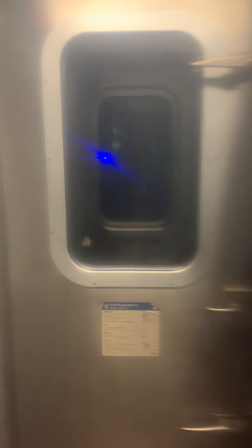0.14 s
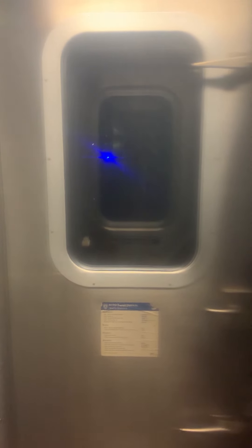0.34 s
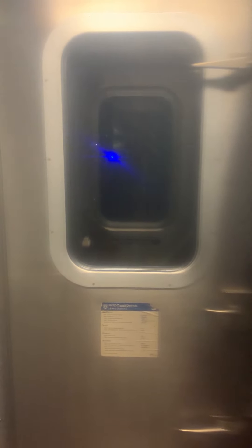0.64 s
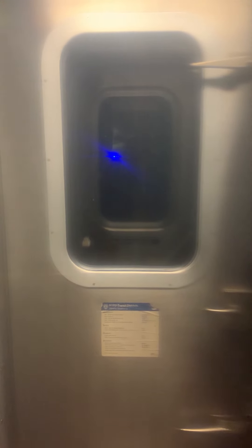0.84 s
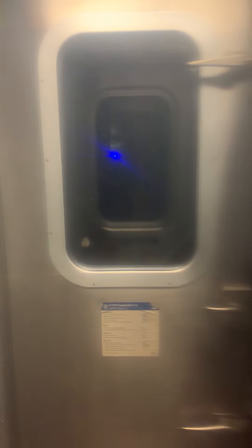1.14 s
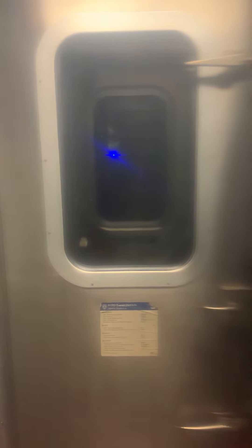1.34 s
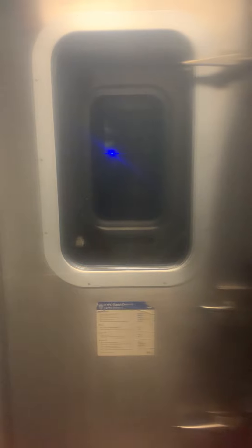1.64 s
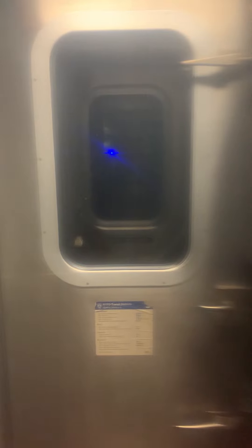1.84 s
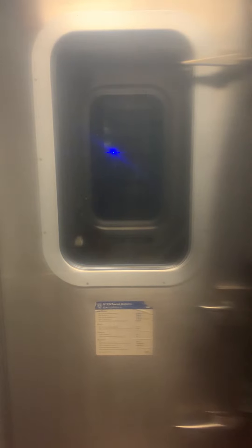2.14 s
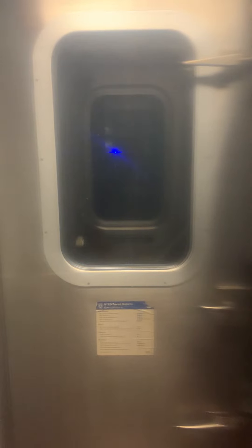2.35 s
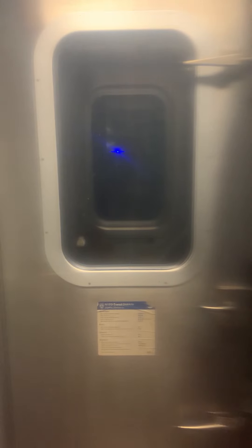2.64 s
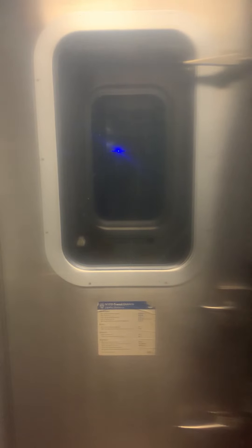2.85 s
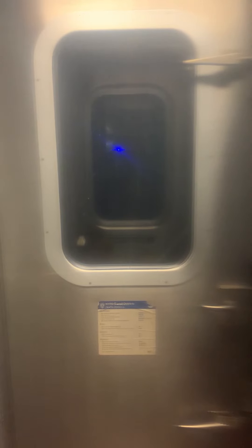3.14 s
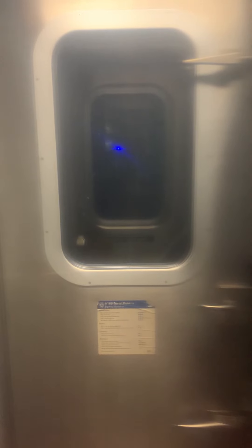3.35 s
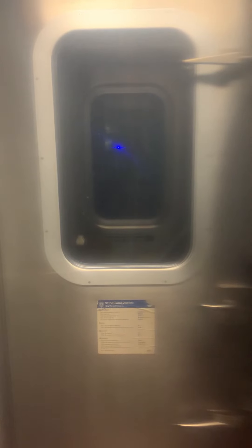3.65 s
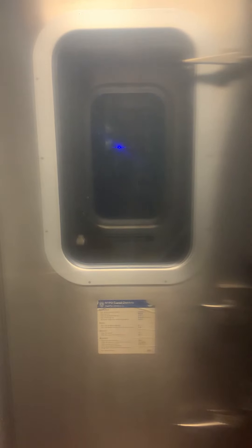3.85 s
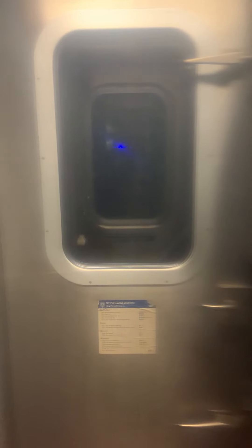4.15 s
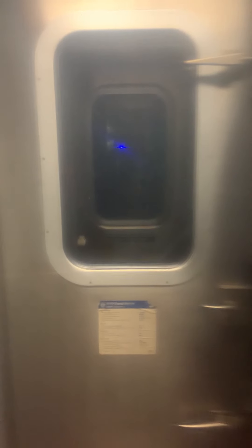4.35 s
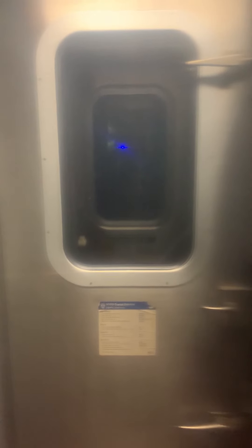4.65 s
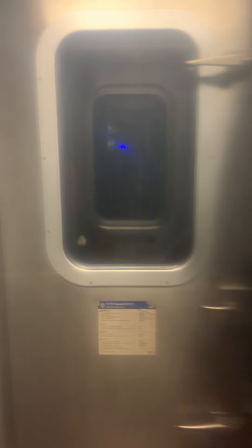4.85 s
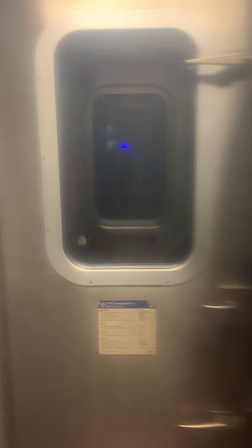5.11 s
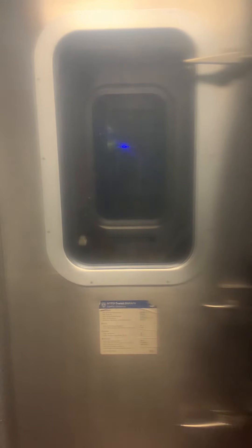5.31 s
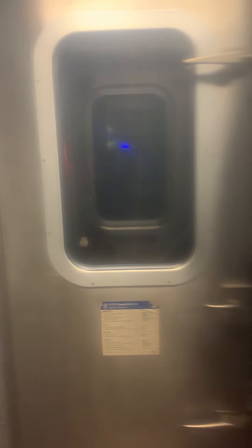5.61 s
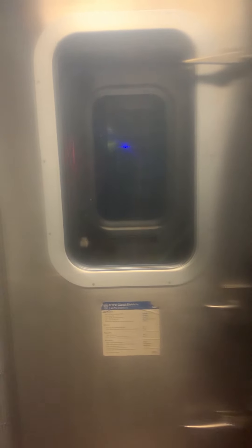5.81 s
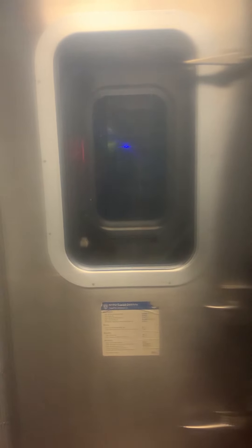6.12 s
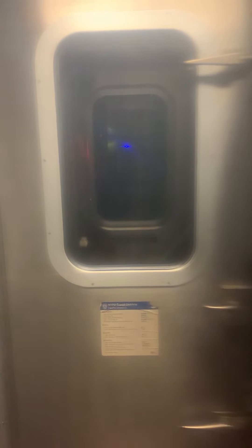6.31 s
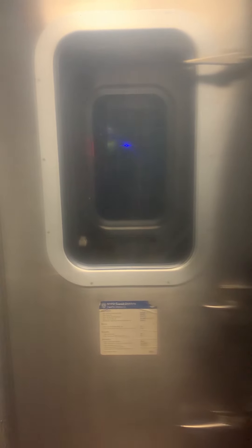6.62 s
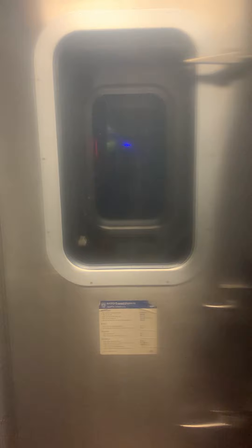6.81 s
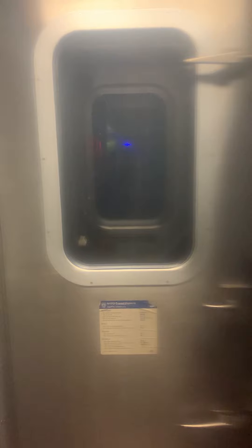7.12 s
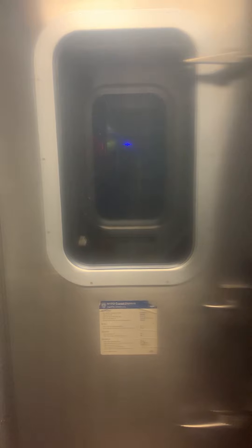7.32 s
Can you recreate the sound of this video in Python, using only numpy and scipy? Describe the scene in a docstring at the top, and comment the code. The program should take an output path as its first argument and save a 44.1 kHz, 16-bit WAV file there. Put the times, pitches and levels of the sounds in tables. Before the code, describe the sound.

Inside a speeding subway car, deep wheel rumble and droning roar continue while a loose end door ticks, thumps and clacks midway.

```python
"""Underground train ride beside a loose door.

Inside the last car at speed, next to the end door: wheel-on-rail noise shakes the floor and roars through
the car's resonances (shaped noise), some of which hum alone; noise bands swell and the wheels sing faintly.
The loose door thumps and clacks, a panel clatters, small metal parts tick and jingle (struck decaying modes).
Two close microphone ports hear the treble almost alike, with the right one later there.
"""
import sys
import numpy as np
from scipy import signal
from scipy.fft import rfft, irfft, next_fast_len
from scipy.io import wavfile

SR = 44100
rng = np.random.default_rng(int(sys.argv[2]) if len(sys.argv) > 2 else 0)


def output_pcm(signal):
    """Save a mono or channel-first signal as 16-bit PCM at the path in sys.argv[1].

    Samples are clipped to [-1, 1] before scaling.
    """
    pcm = np.clip(np.atleast_2d(signal).T, -1, 1) * 32767
    wavfile.write(sys.argv[1], SR, np.round(pcm).astype(np.int16))


N = 329418
SIZE = next_fast_len(N + 4096)
HZ = np.maximum(np.fft.rfftfreq(SIZE, 1 / SR), 1)


def from_db(db):
    """Decibels to gain."""
    return 10 ** (np.asarray(db) / 20)


def rms_one(x):
    """Scale to unit rms."""
    return x / np.sqrt(np.mean(x ** 2) + 1e-20)


def at_hz(points):
    """Read a table on a log-frequency axis at every FFT bin."""
    hz, value = np.transpose(points)
    return np.interp(np.log(HZ), np.log(hz), value)


def drift(rate_hz):
    """Slow chance of spread 1: coarse noise through a double one-pole low-pass."""
    step = 40  # samples
    r = np.exp(-2 * np.pi * step * rate_hz / SR)
    coarse = rng.standard_normal(N // step + 2002)
    slow = signal.lfilter([1], [1, -2 * r, r * r], coarse)[2000:]
    return np.interp(np.arange(N) / step, np.arange(len(slow)), rms_one(slow))


def ring(excitation, hz, t60_s):
    """Two-pole resonator: a unit click sets a decaying sine of height 1 ringing."""
    r = from_db(-60 / (max(t60_s, 1e-4) * SR))
    w = 2 * np.pi * hz / SR
    return signal.lfilter([0, np.sin(w)], [1, -2 * r * np.cos(w), r * r], excitation + 1e-18)


def strikes(times_s, gains):
    """Click train: one sample per strike."""
    clicks = np.zeros(N)
    at = np.minimum((np.asarray(times_s) * SR).astype(int), N - 1)
    np.add.at(clicks, at, gains)
    return clicks


def butter(x, order, hz, kind="low"):
    """Butterworth filter."""
    return signal.sosfilt(signal.butter(order, hz, kind, fs=SR, output="sos"), x)


# resonances of the car body and its air: (frequency [Hz], width [Hz], lift [dB])
CAR_RESONANCES = [(89, 4.4, 4), (120, 22, 2), (159, 11, 2), (215.6, 7.5, 4.5), (288.6, 7.4, 3),
                  (335, 6.2, 4.5), (362, 10, 3), (445, 20, 6.5), (576, 16, 0.5), (621, 33, 4),
                  (1063, 27, 2), (1134, 22, 1)]
# left-right likeness: (frequency [Hz], likeness [0-1])
PORT_LIKENESS = [(30, .998), (250, 0.94), (450, 0.82), (900, 0.51), (1500, 0.56), (2100, 0.39),
                 (2700, 0.76), (3300, 0.84), (4000, 0.97), (6200, 1), (8000, 1), (16000, 1)]


def rolling_layer(spectrum, patchy_db, flicker_hz):
    """Stereo noise through the car's resonances, in half-octave bands that swell partly on their own; rms 1."""
    low_hz, high_hz = spectrum[0][0], spectrum[-1][0]
    shape = from_db(at_hz(spectrum)) * (HZ >= low_hz) * (HZ <= high_hz)
    for hz, width_hz, lift_db in CAR_RESONANCES:
        shape = shape * from_db(lift_db / (1 + (2 * (HZ - hz) / width_hz) ** 2))
    alike = np.clip(at_hz(PORT_LIKENESS), 0, 1)
    mid, side = rfft(rng.standard_normal((2, SIZE)))
    opposed_side = side * [[1], [-1]]
    pair = shape * (np.sqrt(1 + alike) * mid + np.sqrt(1 - alike) * opposed_side)
    half_octaves = 2 * np.log2(HZ)
    out = 0
    for k in range(int(2 * np.log2(low_hz)), int(2 * np.log2(high_hz)) + 2):
        band = np.maximum(1 - np.abs(half_octaves - k), 0)  # overlapping slices that sum to one
        out = out + from_db(patchy_db * drift(flicker_hz)) * irfft(pair * band, SIZE)[:, :N]
    return rms_one(out)


# slow rolling level: (time [s], floor shake [dB], drone [dB], roar [dB], hiss [dB], metallic sizzle [dB])
ROLL_LEVELS = [(0, -28.5, -28, -33.5, -42, -74), (.5, -24, -26, -32, -41.5, -72.5),
               (.95, -28.5, -27.5, -32.5, -41.5, -73.5), (1.3, -26.5, -26.5, -32, -42, -64.5),
               (1.85, -27, -28, -34.5, -42.5, -75), (2.6, -28.5, -27, -32.5, -42, -73),
               (3.1, -30, -28, -34, -42.5, -77.5), (3.6, -31, -32, -34, -43.5, -77),
               (4.2, -26.5, -27.5, -33, -42, -75), (4.6, -26, -28, -33, -43, -74),
               (5.05, -25.5, -28, -33.5, -42.5, -71), (5.6, -29, -29, -34.5, -43, -75),
               (6.1, -30, -26.5, -33, -44, -77), (6.65, -31.5, -30, -34.5, -42.5, -78),
               (7.05, -28, -29, -34, -43.5, -75.5), (7.47, -30, -27.5, -32.5, -43.5, -80)]
# rough rail: (time [s], fall time constant [s], lift of lows [dB], lift of highs [dB]); negative lifts dip
RAIL_SURGES = [(0.311, 0.11, 6, 6), (.59, .08, 5.5, 4), (.68, 0.11, 0.5, 3), (.77, .07, 3, 0),
               (1.03, 0.03, 7, 0.5), (1.24, 0.092, 4, 0), (1.53, 0.062, 3.5, 0.5), (1.95, 0.063, 3, 4.5),
               (2.25, 0.075, 2, 3), (2.4, 0.063, 2.5, 0), (2.77, .07, 2.5, 0.5), (3.24, 0.13, 4.5, 0.5),
               (3.49, .04, 8, 2), (3.63, 0.054, 7, 3.5), (3.92, 0.04, 2, 2.5), (4.28, 0.18, 0.5, 0.5),
               (4.55, 0.032, 1.5, -2), (4.87, .1, 1, 0.5), (5.42, .1, 1, -0.5), (5.78, .07, -1.5, 0.5),
               (6.05, 0.13, -4, 1.5), (6.75, .07, 3.5, -0.5), (7.03, 0.11, 2.5, 1), (7.23, 0.076, 1, 2),
               (7.4, 0.076, 3, -0.5)]
# one row per layer, in ROLL_LEVELS order: (share of low lift [ratio], share of high lift [ratio])
LAYER_SURGE_SHARES = [(0.73, 0.01), (1.17, 0.01), (0.3, 0.48), (0.01, 1.02), (0.01, 0.97)]
SURGE_RISE_S = 0.026


def roll_gains():
    """Gain of each rolling layer: slow level plus its share of every surge (linear rise, exponential fall)."""
    t = np.arange(N) / SR
    coarse_t = t[::64]
    start_s, fall_s, low_db, high_db = np.transpose(RAIL_SURGES)
    since = np.maximum(coarse_t - start_s[:, None], 0)
    rise = np.minimum(since / SURGE_RISE_S, 1)
    fall = np.exp(-np.maximum(since - SURGE_RISE_S, 0) / fall_s[:, None])
    low = np.interp(t, coarse_t, low_db @ (rise * fall))
    high = np.interp(t, coarse_t, high_db @ (rise * fall))
    time_s, *levels = np.transpose(ROLL_LEVELS)
    return [from_db(np.interp(t, time_s, db) + low_share * low + high_share * high)
            for db, (low_share, high_share) in zip(levels, LAYER_SURGE_SHARES)]


# layer spectra before the car's resonances: (frequency [Hz], relative density [dB])
SHAKE_SPECTRUM = [(18, -27), (25, -23), (40, -5), (65, -1), (130, -1.5), (180, -2.5), (230, -27)]
DRONE_SPECTRUM = [(150, -15), (200, -1.5), (260, -3.5), (330, -1), (420, -7), (480, -7), (560, -19.5)]
ROAR_SPECTRUM = [(430, -23.5), (520, -0.5), (650, -0.5), (800, -3.5), (1050, -3), (1200, -6), (1300, -9.5),
                 (1500, -14.5), (1800, -41.5)]
HISS_SPECTRUM = [(1250, -23.5), (1500, -2.5), (1900, -2.5), (2200, -5), (2500, -4.5), (2800, -4.5),
                 (3200, -6.5), (3800, -6.5), (4400, -13.5), (4800, -15.5), (5300, -13.5), (6200, -24.5),
                 (6900, -24), (7300, -28.5), (7700, -34), (8400, -49.5)]
SIZZLE_SPECTRUM = [(7400, -20), (7900, -7), (8500, 0), (9100, -1), (10000, -6), (12000, -8), (14300, -11),
                   (15000, -17), (15500, -36), (16700, -50)]


def rolling_noise():
    """Wheel-on-rail noise: five bands, from floor shake to metallic sizzle, each with its own gain."""
    shake, drone, roar, hiss, sizzle = roll_gains()
    noise = shake * rolling_layer(SHAKE_SPECTRUM, patchy_db=1.44, flicker_hz=3.5)
    noise += drone * rolling_layer(DRONE_SPECTRUM, patchy_db=1.05, flicker_hz=3.2)
    noise += roar * rolling_layer(ROAR_SPECTRUM, patchy_db=1.05, flicker_hz=15)
    noise += hiss * rolling_layer(HISS_SPECTRUM, patchy_db=1.52, flicker_hz=16)
    noise += sizzle * rolling_layer(SIZZLE_SPECTRUM, patchy_db=4.0, flicker_hz=9)
    return noise


# door slams: (time [s], level [dB])
DOOR_THUMPS = [(4.1916, -7), (4.3256, -6.5), (4.447, -15), (4.55, -8.5), (5.4039, -8.5)]
# door leaf modes: (frequency [Hz], level [dB], t60 [s], signed weight [ratio])
LEAF_MODES = [(66.4, -6.5, 0.4, -0.83), (90, -0.5, 0.32, 0.66), (109.7, -8, 0.27, -0.69),
              (157, -7, 0.21, -1.07), (177, -4, 0.068, 0.92)]


def door_thumps():
    """Soft blows on the door leaf; neighbouring low modes start in opposition and beat."""
    time_s, level_db = np.transpose(DOOR_THUMPS)
    blow = strikes(time_s, from_db(level_db))
    return sum(sign * from_db(db) * ring(blow, hz, t60_s) for hz, db, t60_s, sign in LEAF_MODES)


CRUNCH_DB, CRUNCH_FADE_S, CRUNCH_BAND_HZ = -14.5, 0.023, [950, 3300]


def latch_crunch(times_s, gains):
    """The latch grates after each clack: band-passed noise under an exponential fade."""
    pole = np.exp(-1 / (CRUNCH_FADE_S * SR))
    fade = signal.lfilter([1], [1, -pole], strikes(times_s, gains) + 1e-18)
    return fade * rms_one(butter(rng.standard_normal(N), 2, CRUNCH_BAND_HZ, "band"))


LATCH_FREE_S, LATCH_MUTE_S = 0.021, 0.006  # free ringing, then damping time constant


def latch_damping(times_s):
    """Gain of the latch's ringing: full after each clack, then quickly muted."""
    t = np.arange(N) / SR
    last = np.append(-1, times_s)[np.searchsorted(times_s, t + 0.002)]  # reopens 2 ms early
    return np.exp(-np.maximum(t - last - LATCH_FREE_S, 0) / LATCH_MUTE_S)


# latch clacks: (time [s], level [dB], brightness [dB], delay of the bounce [s])
LATCH_CLACKS = [(1.9543, -33.5, -3, .011), (2.231, -33, -25, 0.01), (3.628, -35, -13, 0.0088),
                (4.1773, -22, -3, .011), (4.2088, -35, 9, .006), (4.312, -24.5, 1, .0095),
                (4.341, -35, 3, .006), (4.457, -38.5, 6, .008), (4.5441, -32.5, -8, .011),
                (5.3862, -24, -9, .014)]
# latch modes, main and bright: (frequency [Hz], level [dB], t60 [s])
LATCH_MODES = [(860, -9, 0.1), (1305, -4, 0.099), (1396, -8, 0.066), (1500, -10.5, 0.07), (1677, -9.5, .07),
               (1740, -7.5, 0.08), (2150, -7, 0.025), (2530, -9, 0.025), (2800, -9, .02),
               (3150, -4.5, 0.029), (3600, -12, .015)]
LATCH_BRIGHT_MODES = [(5330, -8, 0.013), (6000, -14.5, .012), (6700, -12.5, .015), (7330, -9, 0.012),
                      (8760, -1.5, 0.005), (10500, -16, .004)]
BOUNCE_DB, BOUNCE_BRIGHT_DB = -5.5, -13  # the bounce is weaker and much duller
CLACK_DELAY_S, CLACK_SOFT_HZ = 0.0018, 7140


def latch_clacks():
    """A hard clack and one bounce excite the latch modes, each with random strength, over a grating crunch."""
    time_s, level_db, bright_db, bounce_s = np.transpose(LATCH_CLACKS)
    time_s = time_s + CLACK_DELAY_S  # each clack sounds 1.8 ms after its listed time
    clack = latch_crunch(time_s, from_db(level_db + CRUNCH_DB))
    groups = ((LATCH_MODES, 0 * time_s, BOUNCE_DB), (LATCH_BRIGHT_MODES, bright_db, BOUNCE_BRIGHT_DB))
    for modes, extra_db, bounce_db in groups:
        for hz, db, t60_s in modes:
            luck_db = rng.normal(0, 2.1, len(time_s))
            first = from_db(level_db + extra_db + db - 4.0 + luck_db)
            bounce = first * from_db(bounce_db) * rng.choice([-1, 1], len(time_s))
            blows = strikes(time_s, first) + strikes(time_s + bounce_s, bounce)
            clack += ring(blows, hz, t60_s)
    return latch_damping(time_s) * butter(clack, 3, CLACK_SOFT_HZ)


# knocks of a loose panel: (time [s], level [dB])
PANEL_KNOCKS = [(3.905, -41), (3.9285, -30), (3.934, -30.5), (3.947, -29), (3.9525, -33)]
# panel modes: (frequency [Hz], level [dB], t60 [s])
PANEL_MODES = [(940, 1.8, 0.096), (1120, -0.5, .07), (1760, -12, .03), (2500, -14, .03), (2950, -9, .025)]
KNOCK_SOFT_HZ = 3500


def clatter():
    """Loose panel: each soft knock strikes every mode with a strength of its own."""
    time_s, level_db = np.transpose(PANEL_KNOCKS)
    luck_db = 1.5 * rng.standard_normal((len(time_s), len(PANEL_MODES)))
    rings = np.zeros(N)
    for k, (hz, db, t60_s) in enumerate(PANEL_MODES):
        rings += ring(strikes(time_s, from_db(level_db + db + luck_db[:, k])), hz, t60_s)
    return butter(rings, 4, KNOCK_SOFT_HZ)


# dry ticks close by: (time [s], level [dB], gain of the modes below 9 kHz [dB])
DRY_TICKS = [(0.418, -34, -1.5), (0.9417, -41, -3), (1.219, -48, 0.1), (1.287, -13.5, -0.3),
             (1.5059, -45, -1), (2.14, -37, -1), (2.2244, -55, -3), (2.595, -54, 0.1), (3.0694, -48, -3),
             (3.292, -35, -2), (3.3044, -50, -2), (3.5116, -35.5, -2), (3.771, -50, -8), (3.7782, -39, -8),
             (3.7924, -48, -8), (3.8301, -34, -8), (3.8554, -38, -9), (4.3064, -49, 0.1), (4.362, -52, -10)]
# contact modes: (frequency [Hz], level [dB], t60 [s])
TICK_CONTACT_MODES = [(1500, 3.5, 0.0023), (4100, 4.5, 0.0014), (7200, 6, 0.00074), (11000, -17, .0006),
                      (15000, -31, .0004)]
TICK_CUT_HZ, TICK_DELAY_S = 740, 0.00098
TICK_TAIL_DB, TICK_TAIL_S = -27.5, 0.004
TICK_RATTLE_TOP_DB = -28  # louder ticks gain no more rattle


def ticks():
    """One sharp contact each on fast-dying modes, and a short faint noise rattle after it."""
    out, t = np.zeros(N), np.arange(900) / SR
    grits = rng.standard_normal((len(DRY_TICKS), len(t)))
    for (time_s, level_db, full_db), grit in zip(DRY_TICKS, grits):
        rattle_db = min(level_db, TICK_RATTLE_TOP_DB) + TICK_TAIL_DB
        click = from_db(level_db) * (t == 0) + from_db(rattle_db) * grit * np.exp(-t / TICK_TAIL_S)
        at = int((time_s + TICK_DELAY_S) * SR)  # each tick sounds about 1 ms after its listed time
        for hz, mode_db, t60_s in TICK_CONTACT_MODES:
            out[at:at + len(t)] += from_db(mode_db + full_db * (hz < 9000)) * ring(click, hz, t60_s)
    return butter(out, 2, TICK_CUT_HZ, "high")


# small loose metal: (time [s], peak [dB], pitch [Hz])
METAL_JINGLES = [(0.2329, -56, 10500), (1.0385, -57, 11500), (1.062, -48, 11900), (1.1398, -42, 12100),
                 (1.7569, -59, 11200), (1.085, -58, 12400), (1.152, -52, 12600), (1.948, -46, 11400),
                 (2.0278, -48, 11200), (2.4638, -47, 10800), (2.4753, -48, 11500), (2.5661, -49, 10750),
                 (2.6784, -44, 11200), (4.1505, -54, 11500), (4.2662, -58, 11500), (5.452, -65, 11400),
                 (6.4507, -63, 11300)]
JINGLE_SPREAD, JINGLE_T60_S = 0.05, 0.027  # spread: relative detuning
JINGLE_RISE_S, JINGLE_RATTLE_S = 0.004, 0.011
JINGLE_TAIL_DB, JINGLE_TAIL_S = -12, 0.028


def jingles():
    """A short rattle of tiny touches excites a cluster of close high modes, with a rough noise tail."""
    out, span = np.zeros(N), 4000
    t = np.arange(span) / SR
    rise = np.minimum(t / JINGLE_RISE_S, 1)
    draws = rng.standard_normal((len(METAL_JINGLES), span + 5))
    for (time_s, peak_db, hz), draw in zip(METAL_JINGLES, draws):
        grit = draw[5:]
        rattle = grit ** 3 * np.exp(-t / JINGLE_RATTLE_S) * rise  # cubing makes it sparse
        detune = np.append(0, draw[1:5] * JINGLE_SPREAD)
        cluster = sum(ring(rattle, hz * (1 + d), JINGLE_T60_S) * from_db(-120 * abs(d)) for d in detune)
        tail = from_db(JINGLE_TAIL_DB) * grit[::-1] * np.exp(-t / JINGLE_TAIL_S) * rise
        jingle = cluster / np.abs(cluster).max() + tail
        jingle = butter(jingle, 2, [0.89 * hz, 1.11 * hz], "band")
        at = int((time_s - JINGLE_RISE_S) * SR)
        out[at:at + span] += from_db(peak_db) * jingle / np.abs(jingle).max()
    return out


# a narrow or broad band of noise swells for a moment:
# (time [s], length [s], frequency [Hz], width [Hz], level [dB])
NOISE_SWELLS = [(0.331, 0.22, 291, 45, -21), (0.3, 0.22, 2000, 1500, -43), (.32, 0.046, 2830, 200, -41),
                (.38, 0.065, 2240, 100, -46), (0.578, .1, 2200, 2000, -47), (0.658, .2, 2600, 2000, -47),
                (0.334, 0.14, 111, 29.8, -24), (0.369, .09, 420, 40, -26), (0.586, 0.064, 60, 30, -22),
                (0.629, 0.13, 101, 35, -20), (0.753, 0.076, 84, 25, -20.5), (.76, 0.1, 312, 50, -26.5),
                (1.15, 0.17, 442, 24.7, -27), (1.52, 0.12, 160, 25, -25), (1.872, 0.14, 5200, 700, -50),
                (1.949, 0.2, 352, 70, -21.5), (0.313, 0.16, 8800, 2200, -59), (.4, .1, 12900, 900, -72),
                (0.618, .14, 12600, 700, -68), (.62, 0.23, 8800, 1500, -67), (.98, .25, 8700, 1000, -71),
                (1.12, .2, 13200, 900, -72), (2.22, 0.3, 8900, 500, -65), (2.24, 0.19, 9900, 800, -69),
                (2.25, .1, 11700, 900, -75), (3.619, 0.079, 3420, 900, -40), (3.92, .09, 2800, 1200, -47),
                (3.74, .16, 13600, 800, -78), (4.33, .28, 13400, 900, -71), (4.17, .2, 8700, 1200, -72),
                (4.93, .3, 13300, 900, -82), (5.52, .25, 13500, 800, -78), (6.28, .18, 13700, 800, -81),
                (4.241, .07, 80, 40, -24), (4.379, 0.07, 85.3, 40, -21.5), (4.488, 0.076, 80, 40, -21),
                (4.6, 0.066, 79.5, 40, -22.5), (4.498, 0.11, 1310, 250, -38.5),
                (5.75, 0.092, 335, 24.6, -26), (6.171, 0.091, 1315, 50, -43), (6.999, 0.31, 330, 25, -31.5),
                (7.36, 0.11, 525, 30, -35), (7.33, 0.11, 8900, 1800, -61.5)]


def swells():
    """Noise through two equal resonators under a smooth bump with a quicker rise than fall."""
    out = np.zeros(N)
    whites = rng.standard_normal((len(NOISE_SWELLS), 16000))
    for (time_s, length_s, hz, width_hz, db), white in zip(NOISE_SWELLS, whites):
        t60_s = 1.6 / width_hz
        band = rms_one(ring(ring(white, hz, t60_s), hz, t60_s)[4000:])  # at most 12000 samples sound
        along = np.minimum(np.arange(len(band)) / (length_s * SR), 1)
        at = int(time_s * SR)
        out[at:at + len(band)] += (from_db(db) * np.sin(np.pi * along ** 0.7) * band)[:N - at]
    return out


def wavering_note(hz, t60_s, level_db, waver_db, waver_hz):
    """Noise through one resonator, its level drifting at random."""
    gain = from_db(level_db + waver_db * drift(waver_hz))
    return gain * rms_one(ring(rng.standard_normal(N), hz, t60_s))


# car resonances that hum on their own: (frequency [Hz], width [Hz], level [dB])
CAR_HUMS = [(291, 15, -38.5), (335, 18, -43.5), (442, 31, -46), (576.7, 22, -45), (1061.3, 16, -46),
            (1136, 30, -49)]


def humming():
    """Narrow bands of noise, one for each humming resonance, each swelling and fading."""
    return sum(wavering_note(hz, 2.74 / width_hz, db, waver_db=3, waver_hz=2.6)
               for hz, width_hz, db in CAR_HUMS)


# slow level of the wheel song: (time [s], level [dB])
SINGING_LEVEL = [(0, -58.5), (1.5, -56.5), (3, -62), (3.8, -57), (4.6, -55.5), (5.4, -54), (5.8, -54),
                 (6.2, -53), (6.55, -52), (6.9, -51.5), (7.47, -52.5)]
WHINE_HZ = 5997  # one of the wheel notes
# wheel notes: (frequency [Hz], width [Hz], level [dB])
WHEEL_NOTES = [(2557, 13, -1.5), (2472, 35, 0.5), (2390, 43, -2.5), (2330, 40, -7), (1900, 53, -8),
               (1995, 40, -6), (WHINE_HZ, 13, -17.5), (6377, 60, -16.5), (6550, 200, -13)]


def singing():
    """Faint wheel song: narrow bands of noise, one for each note, each coming and going."""
    notes = sum(wavering_note(hz, 2.4 / width_hz, db, waver_db=2.2, waver_hz=5)
                for hz, width_hz, db in WHEEL_NOTES)
    return from_db(np.interp(np.arange(N) / SR, *np.transpose(SINGING_LEVEL))) * notes


def scene():
    """Stereo rolling noise, with all other sources alike in both channels."""
    door = door_thumps() + latch_clacks()
    small_parts = clatter() + ticks() + jingles()
    return rolling_noise() + door + small_parts + swells() + humming() + singing()


# port balance: (frequency [Hz], left minus right [dB])
PORT_BALANCE = [(60, 2.0), (120, 1.5), (240, 4.5), (480, 0), (950, -1.5), (1890, 0), (3770, 0.5), (7520, 0),
                (15000, 0)]
# (frequency [Hz], phase lead of the right port [rad]); negative is later
RIGHT_LEAD = [(20, 0), (150, .19), (400, .54), (800, .37), (1100, .57), (1500, -.28), (1900, -.55),
              (2300, -1.14), (3000, -1.46), (3800, -1.88), (4700, -3.13), (6500, -6.13), (9000, -9.5),
              (13300, -15.78), (16800, -21)]
FADE_IN_S, CUTOFF_HZ = 0.004, 16750


def record(dry):
    """Two ports that differ in colour and phase; short fade-in, steep treble cut."""
    tilt = from_db(at_hz(PORT_BALANCE) / 2)
    lead_rad = np.interp(HZ, *np.transpose(RIGHT_LEAD))
    fade = np.minimum(np.arange(N) / (FADE_IN_S * SR), 1)
    ports = rfft(dry * fade, SIZE) * [tilt, np.exp(1j * lead_rad) / tilt]
    treble_cut = signal.cheby2(16, 70, CUTOFF_HZ, fs=SR, output="sos")
    return signal.sosfilt(treble_cut, irfft(ports, SIZE)[:, :N])


dry = scene()
out = record(dry)
output_pcm(out)
```